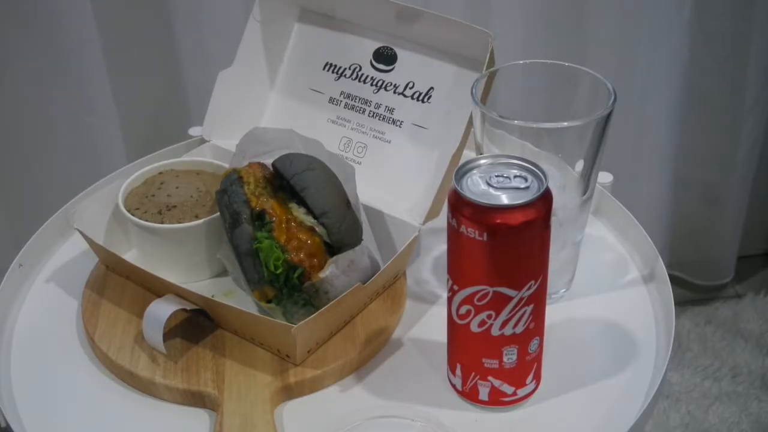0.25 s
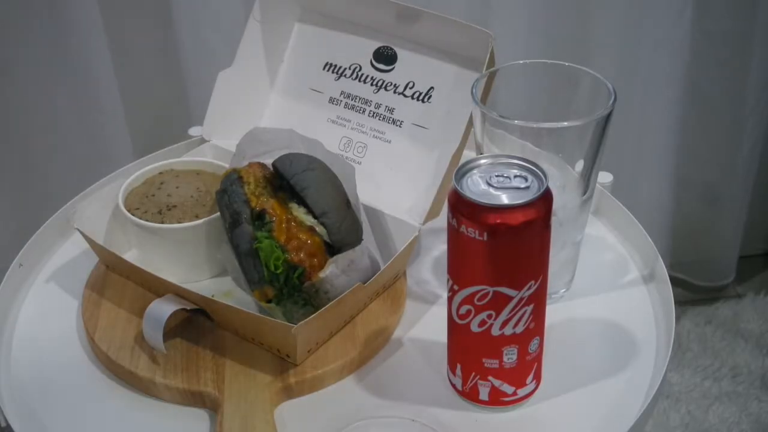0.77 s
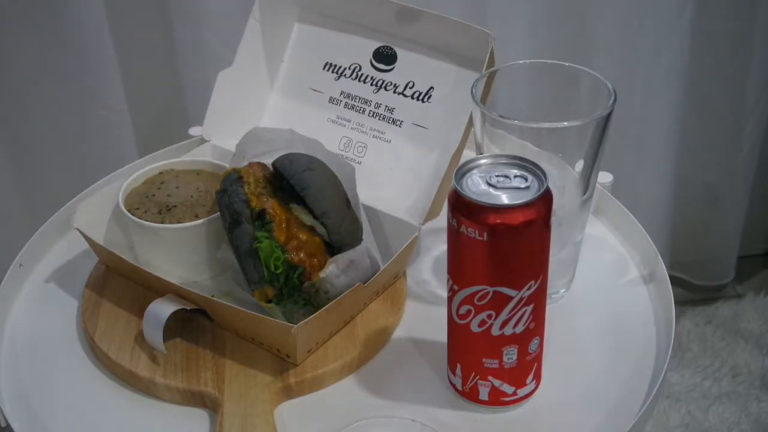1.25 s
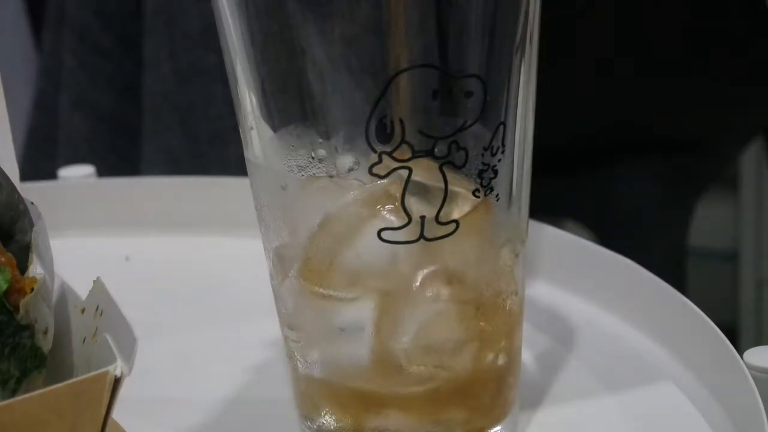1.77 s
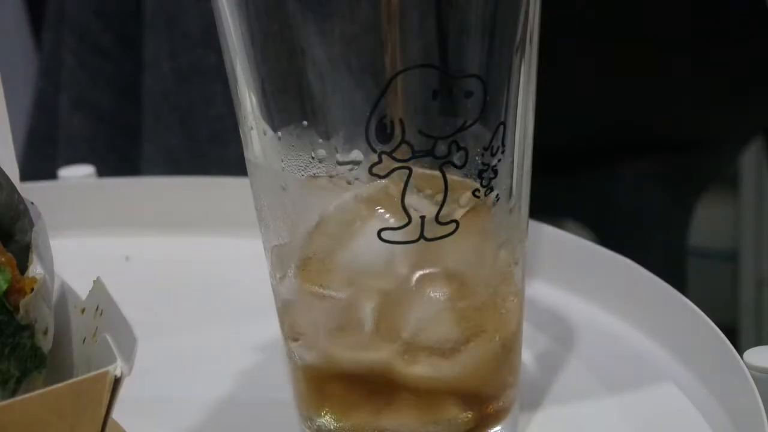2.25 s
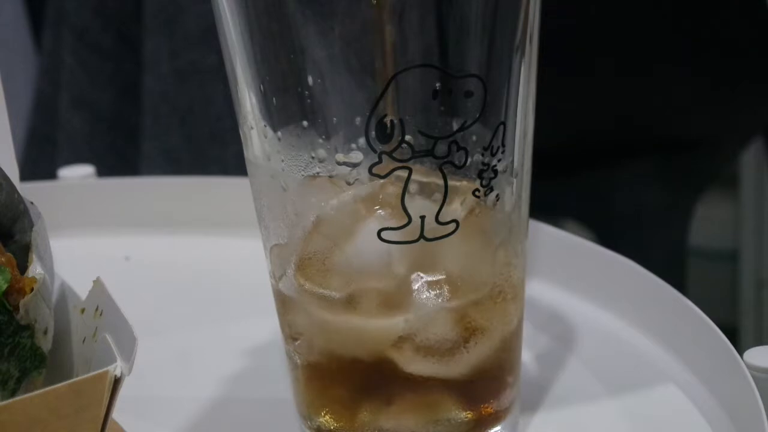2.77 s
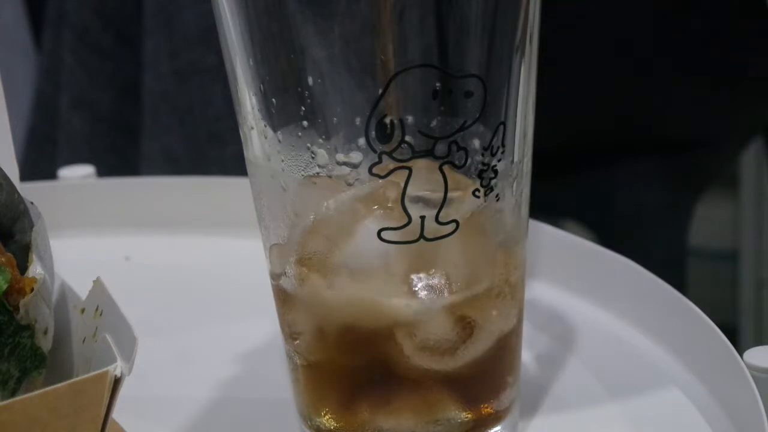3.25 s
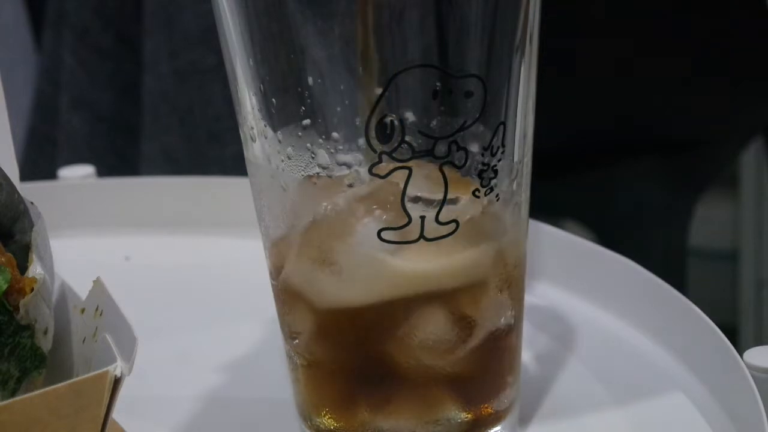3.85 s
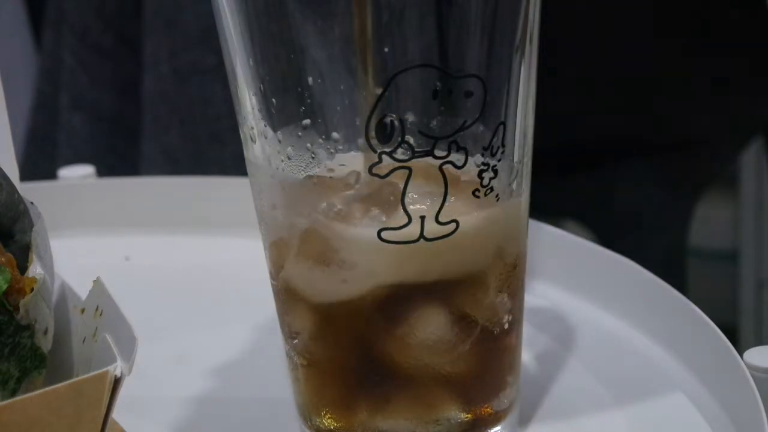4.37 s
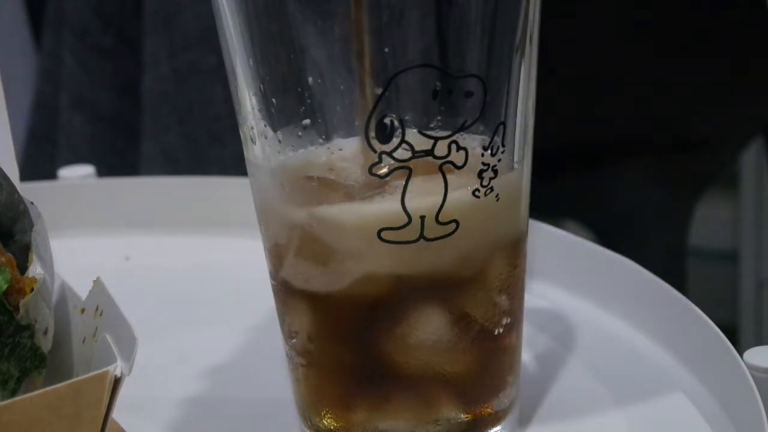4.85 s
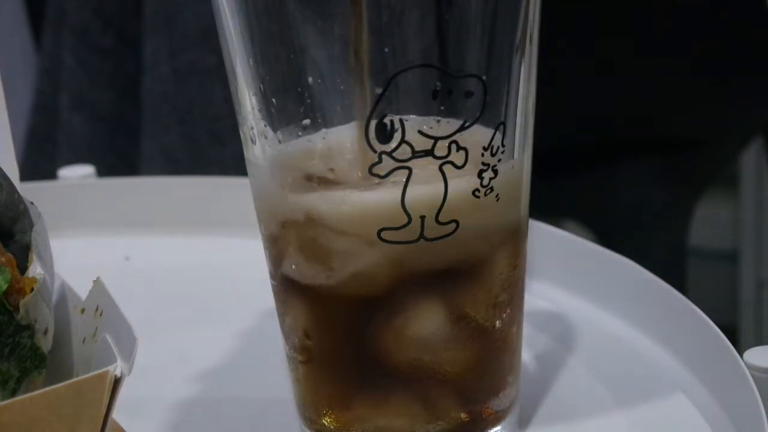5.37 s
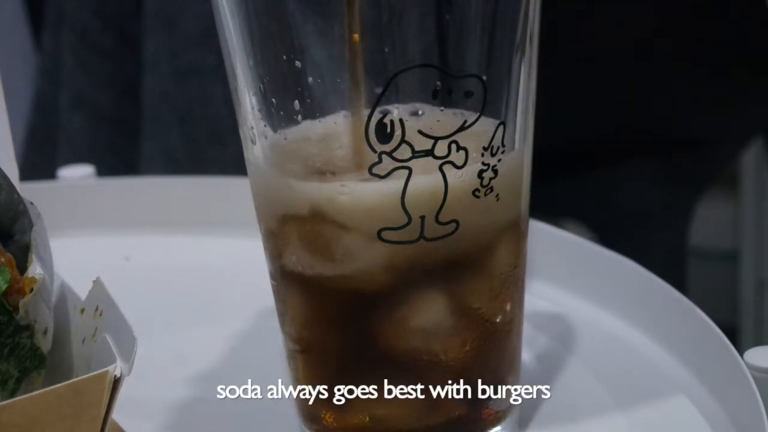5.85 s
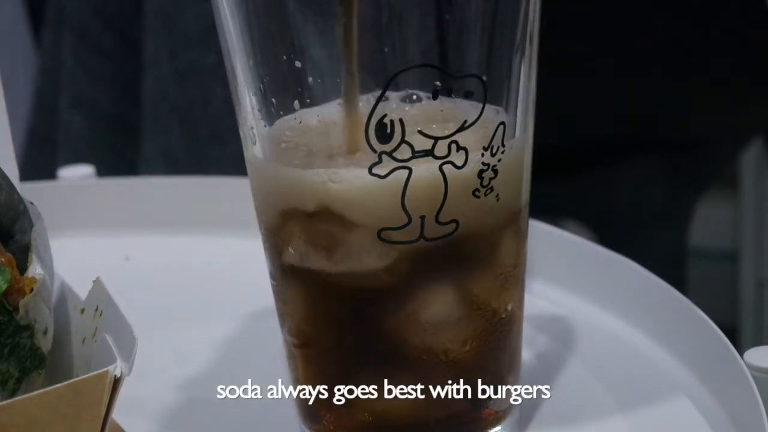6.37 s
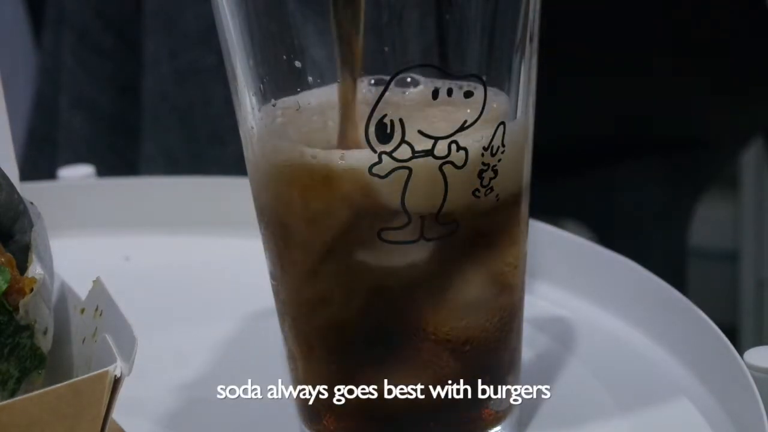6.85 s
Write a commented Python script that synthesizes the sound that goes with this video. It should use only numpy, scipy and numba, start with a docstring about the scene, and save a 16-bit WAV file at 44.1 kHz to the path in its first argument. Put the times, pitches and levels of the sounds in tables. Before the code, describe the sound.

A drink can pops and spits gas in a quiet kitchen, followed by a bubbly, fizzing pour onto ice that ticks and knocks.

```python
"""A can of fizzy drink is cracked open in a small kitchen and poured over ice into a tall glass.
Lid snaps are sums of decaying modes plus noise scratches; the escaping gas is a dense spray over a low rush.
Stream, froth and gurgle are swarms of damped sines, some ringing the air in the glass.
Noise bursts make the ice crack and knock; bubbles, and pings, some from cracking ice, are ringing chirps.
Behind them lie a room tone, a mains hum and a low rumble."""
import sys
import numpy as np
from scipy import signal
from scipy.fft import rfft, irfft
from scipy.io import wavfile
from scipy.ndimage import uniform_filter1d
from numba import njit

SR = 44100
rng = np.random.default_rng(int(sys.argv[2]) if len(sys.argv) > 2 else 0)


def generate_wav(signal):
    """Clip the signal to [-1, 1] and save it as 16-bit WAV at the path in sys.argv[1]."""
    frames = np.transpose(np.atleast_2d(signal))
    scaled = np.clip(frames, -1, 1) * 32767
    pcm = np.round(scaled).astype(np.int16)
    wavfile.write(sys.argv[1], SR, pcm)


N = 313462
T = np.arange(N) / SR
OPEN_S = 1.335

# stream surges and slaps on the ice: t/s, extra level/dB, 1/e half-width/s
STREAM_SURGES = [(2.018, 7.5, 0.045), (2.25, 2, 0.036), (2.69, 6.5, 0.027), (2.906, 5.5, 0.022),
                 (3.043, 1.5, 0.026), (3.765, 1, .04), (4.195, 5.5, .04), (4.5, 5.5, 0.072), (4.64, 4, .04),
                 (4.942, 6.5, 0.041), (5.15, 3.5, 0.081), (5.434, 2, 0.027), (5.67, 2.5, 0.035),
                 (5.798, 1.5, 0.022), (6.771, 6, .018)]


def undb(db):
    """Decibels to gain."""
    return 10 ** (np.asarray(db) / 20)


def unit(x):
    """Scale to rms 1."""
    return x / np.sqrt(np.mean(x ** 2))


def curves(table):
    """Columns of a table, linearly interpolated over time."""
    s, *columns = np.transpose(table)
    return [np.interp(T, s, c) for c in columns]


def swells(table):
    """Gaussian level rises in dB from rows of t/s, level/dB, 1/e half-width/s."""
    return sum(db * np.exp(-((T - s) / half_s) ** 2) for s, db, half_s in table)


def add(out, s, x, peak_db):
    """Mix x in at time s, scaled to the given peak level."""
    i = int(s * SR)
    scaled = x * undb(peak_db) / np.abs(x).max()
    out[i:i + len(x)] += scaled[:len(out) - i]


def colour(x, points):
    """Minimum-phase filter through (f/Hz, level/dB) points, by folding the cepstrum."""
    hz, db = np.transpose(points)
    size = 8192
    bin_hz = np.arange(size // 2 + 1) * SR / size
    gain = undb(np.interp(np.log(bin_hz + 1), np.log(hz), db))
    cepstrum = irfft(np.log(gain))
    cepstrum[1:size // 2] *= 2
    cepstrum[size // 2 + 1:] = 0
    impulse = irfft(np.exp(rfft(cepstrum)))
    return signal.fftconvolve(x, impulse)[:len(x)]


@njit
def resonate(x, hz, width_hz):
    """State-variable band-pass with a movable centre, gain 1 at the centre."""
    y, band, low = np.empty(len(x)), 0., 0.
    for i in range(len(x)):
        g, damping = np.tan(np.pi * hz[i] / SR), width_hz / hz[i]
        v = (band + g * (x[i] + 1e-18 - low)) / (1 + g * (g + damping))
        band = 2 * v - band
        low += 2 * g * v
        y[i] = damping * v
    return y


@njit
def chirps(start_s, hz, cycles, size, glide):
    """Damped sines: each falls 60 dB in its cycles while its pitch rises by the fraction glide."""
    out = np.zeros(N)
    for k in range(len(start_s)):
        length, first = int(cycles[k] / hz[k] * SR) + 2, int(start_s[k] * SR)
        turn = 2 * np.pi * hz[k] / SR
        phasor = size[k] + 0j
        step = np.exp(1j * turn - 6.9 / length)
        rise = np.exp(1j * turn * glide / length)
        for i in range(first, min(first + length, N)):
            out[i] += phasor.imag
            phasor *= step
            step *= rise
    return out


def bubbles(count, low_hz, high_hz, cycles, spread_db, glide):
    """Randomly timed damped sines, log-uniform in pitch, levels spread exponentially in dB; rms 1."""
    when, pitch, life, size = rng.random((count, 4)).T
    hz = low_hz * (high_hz / low_hz) ** pitch
    strength = np.minimum(-np.log(1 - size), 5.5)
    return unit(chirps(when * N / SR, hz, cycles * (.5 + life), undb(spread_db * strength), float(glide)))


def noise(points):
    """Coloured noise of rms 1."""
    return unit(colour(rng.standard_normal(N), points))


def walk(rate_hz):
    """Smoothed random steps, rms near 1."""
    k = int(SR / rate_hz)
    steps = np.repeat(rng.standard_normal(N // k + 1), k)
    return unit(uniform_filter1d(steps, k)[:N])


def burst(t60_s):
    """Decaying noise, 0.1 s long."""
    t = T[:SR // 10]
    return rng.standard_normal(len(t)) * undb(-60 * t / t60_s)


def can():
    """Each snap of the aluminium rings lid modes, t*exp(-t/tau), with a thin scratch on top."""
    # lid and can modes: f/Hz, relative level/dB, tau/s
    lid_modes = [(804, -5.5, 0.0055), (1207, 2, 0.0011), (2276, -9.5, 0.0015), (2830, -1.5, 0.0015),
                 (3580, -6.5, 0.0011), (4060, -3.5, 0.00061), (5140, -12, 0.00057), (782, -27, 0.016),
                 (860, -25, 0.014), (1170, -37, .012), (1264, -19.5, 0.017), (1365, -24, 0.0088),
                 (2120, -34, 0.0088), (2890, -42, .008)]
    # tab strains, score bursts, flap tears on: t/s, ring peak/dB, push centre f/Hz, scratch re ring/dB
    snaps = [(1.335, -32, 1300, -13), (1.341, -33, 2400, -10), (1.347, -28, 3600, -10),
             (1.3515, -25, 1300, -26), (1.3556, -4, 1940, -21), (1.3648, -20, 2600, -14),
             (1.368, -18.5, 1400, -16), (1.3735, -24, 1210, -26), (1.378, -22, 2200, -24),
             (1.3847, -27, 3020, -20), (1.3895, -33, 1200, -18), (1.397, -30, 1300, -11),
             (1.403, -27, 1100, -2), (1.4168, -24.5, 2200, -20), (1.427, -28, 1307, -20),
             (1.4333, -25, 1500, -14), (1.4395, -25.5, 1890, -10), (1.447, -32, 2600, -5),
             (1.4517, -24, 980, -24), (1.459, -44, 990, -20), (1.477, -47, 1500, 13.5),
             (1.51, -49.5, 2500, 13), (1.5265, -50, 1800, 4), (1.5912, -39, 1790, -5)]
    scratch_spectrum = [(300, -14), (1000, 0), (6000, 5.5), (8000, -3.0), (15000, -1)]
    burst_s = 1.356
    out, t = np.zeros(N), T[:SR // 5]
    rest_hz, mode_db, tau_s = np.transpose(lid_modes)[..., None]
    for s, peak_db, push_hz, scratch_db in snaps:
        # lid bends before and after the burst: random detuning, most for fast-decaying modes
        bend = min(abs(s - burst_s) / 0.019, 1)
        hz = rest_hz + bend * 0.21 / tau_s * np.clip(rng.standard_normal(tau_s.shape), -2, 2)
        # modes near the push centre ring most
        gain = undb(mode_db - 4.1 * np.log2(rest_hz / push_hz) ** 2)
        modes = gain * t / tau_s * np.exp(-t / tau_s) * np.sin(2 * np.pi * hz * t)
        add(out, s, np.sum(modes, axis=0), peak_db)
        add(out, s, colour(burst(t60_s=0.025), scratch_spectrum), peak_db + scratch_db)
    return out


def gas():
    """Gas leaves as a bright spray and a low rush: fast onset, spurt, sag, then spent."""
    # spray spectrum: f/Hz, level/dB
    spray_spectrum = [(1200, -28), (2000, -9.5), (3000, -12), (4600, -4.5), (6500, -13), (9000, -2.5),
                      (12500, 1.5), (15000, 6.5)]
    # rush spectrum: f/Hz, level/dB
    rush_spectrum = [(25, -2.5), (40, -10), (65, -15), (97, 3), (156, -19.5), (300, 2.5), (400, -7),
                     (800, -8), (2000, -18), (3000, -49)]
    attack_s, spent_s, spurt_s = 0.0058, .26, 0.024
    spray_base_db, rush_db, spurt_db, sag_db_per_s = -46.5, -43.5, 6.5, 15
    age_s = np.maximum(T - OPEN_S + attack_s / 2, 0)
    pressure = np.minimum(age_s / attack_s, 1) * np.exp(-(age_s / spent_s) ** 4)
    spray_db = spray_base_db + spurt_db * np.exp(-age_s / spurt_s) - sag_db_per_s * age_s
    jets = bubbles(count=30000, low_hz=1950, high_hz=15200, cycles=3.6, spread_db=2.5, glide=0)
    spray = unit(colour(jets, spray_spectrum))
    return pressure * (undb(spray_db) * spray + undb(rush_db) * noise(rush_spectrum))


def driven(surge_db, full_db, per_flow, per_surge):
    """Layer gain from full-flow level, and dB per dB of flow and of surge."""
    # can tilt sets the stream: t/s, flow re full stream/dB
    flow = [(1.62, -8.5), (1.95, -12), (2.14, -8.5), (2.3, -4), (2.54, -7.5), (2.8, -4), (3.2, -5),
            (3.56, -7), (3.75, -3), (4.32, -2), (4.5, -2.5), (4.76, -1), (5.12, 0), (5.7, -1), (6.0, -5),
            (6.58, -4), (6.82, 0), (7.11, -2)]
    flow_db, = curves(flow)
    return undb(full_db + per_flow * flow_db + per_surge * surge_db)


def glass(x, note_db, width_hz):
    """The air column rings with whatever stirs it; its lowest note rises as the glass fills."""
    # upper air resonances: f/Hz, width/Hz, relative level/dB
    upper_modes = [(2220, 80, -4.5), (2847, 126, 2.5), (3890, 760, -2.5), (4660, 98, 2.5)]
    # filling: t/s, lowest resonance f/Hz, level of the upper ones/dB
    air_note = [(1.6, 720, -1.5), (3.2, 792, -7), (3.7, 870, 4.5), (4.5, 920, 3), (5.2, 990, -4.5),
                (6.0, 1000, 5), (7.1, 1130, -4.5)]
    note_hz, upper_db = curves(air_note)
    lowest = resonate(x, note_hz, float(width_hz))
    upper = sum(undb(db) * resonate(x, np.full(N, float(hz)), float(width)) for hz, width, db in upper_modes)
    return x + undb(note_db) * lowest + undb(upper_db) * upper


def pour():
    """The wobbling stream traps large bubbles, spatters on ice, slaps in drops; froth bubbles burst."""
    # splash spectrum: f/Hz, level/dB
    splash_spectrum = [(210, -30), (350, -4), (614, -8), (705, 0), (1030, 2), (1190, -1.5), (1960, -1),
                       (2200, -8), (2860, -35), (4840, -120)]
    # spatter spectrum: f/Hz, level/dB
    spatter_spectrum = [(1300, -9.5), (1800, -5.5), (2500, 0), (3200, -0.5), (4500, 0), (5200, 0.5),
                        (7000, -18.5)]
    # fizz spectrum: f/Hz, level/dB
    fizz_spectrum = [(2650, -29), (4500, -7.5), (4740, -14), (5420, -8), (7100, -2.5), (8200, -3),
                     (12500, 6), (14400, 8.5), (15000, 8), (15500, 6.5)]
    surge_db = swells(STREAM_SURGES) + 1.05 * walk(rate_hz=28)
    # stream lands on a bare cube for a while: more spatter, less splash
    bare = np.exp(-((T - 3.1) / 0.72) ** 2)

    large = bubbles(count=9000, low_hz=363, high_hz=2150, cycles=4.8, spread_db=2, glide=0.13)
    blips = bubbles(count=260, low_hz=452, high_hz=1480, cycles=20, spread_db=1.0, glide=.15)
    splash = unit(colour(large, splash_spectrum)) + undb(-7.5) * blips
    splash = unit(glass(splash, note_db=-10.5, width_hz=150)) * undb(-1.5 * bare)
    splash *= driven(surge_db, full_db=-55.5, per_flow=0.66, per_surge=0.86)

    specks = bubbles(count=16000, low_hz=1500, high_hz=5730, cycles=3.7, spread_db=0.0, glide=0.093)
    drops = bubbles(count=700, low_hz=1010, high_hz=4000, cycles=5.1, spread_db=3.0, glide=0)
    spatter = unit(colour(specks, spatter_spectrum)) + undb(-6.5) * drops
    spatter = unit(glass(spatter, note_db=-8, width_hz=220)) * undb(5.5 * bare)
    spatter *= driven(surge_db, full_db=-57.5, per_flow=1.22, per_surge=0.71)

    froth = bubbles(count=70000, low_hz=3940, high_hz=16000, cycles=4.1, spread_db=0.0, glide=0)
    prickle = bubbles(count=1500, low_hz=6000, high_hz=14800, cycles=34, spread_db=3.5, glide=.04)
    fizz = unit(colour(froth, fizz_spectrum)) + undb(-14) * prickle
    fizz *= driven(surge_db, full_db=-53, per_flow=0.98, per_surge=.35)
    return splash + spatter + fizz


def gurgle():
    """The stream plunges into the first shallow pool and traps bubbles of nearly one size."""
    # gurgles: t/s, 1/e half-width/s, level/dB
    gurgles = [(2.01, 0.047, -60), (2.28, 0.12, -60.5)]
    swell = sum(undb(db) * np.exp(-((T - s) / half_s) ** 2) for s, half_s, db in gurgles)
    return swell * bubbles(count=1800, low_hz=1400, high_hz=2050, cycles=20, spread_db=1.5, glide=.08)


def ice():
    """Cubes crack with a bright tick, and knock dully in the glass as they start to float."""
    # cracks in the warm drink: t/s, relative peak level/dB
    cracks_at = [(1.993, -30.5), (1.997, -30.5), (2.676, -30), (2.876, -36), (3.0334, -39), (3.759, -33),
                 (4.0343, -30), (4.0562, -36), (4.1477, -23.5), (4.159, -19), (4.176, -19.5), (4.193, -28),
                 (4.22, -31), (4.402, -34), (4.423, -33), (4.449, -33), (4.469, -31), (4.5503, -31),
                 (4.93, -34), (4.937, -37), (5.412, -38)]
    # crack spectrum: f/Hz, level/dB
    crack_spectrum = [(600, -7), (1000, -1.5), (2000, -6.5), (4800, -9.5), (6200, 0.5), (8500, -0.5),
                      (10000, -2.5), (12500, -2.5), (15000, -1.5)]
    # cubes shift and knock: t/s, relative peak level/dB
    knocks_at = [(3.725, -31.5), (3.758, -36.5), (3.928, -43), (4.104, -41), (4.159, -32), (4.176, -33),
                 (4.199, -35), (4.258, -29.5), (4.371, -33), (4.468, -28.5), (4.488, -35), (4.519, -37),
                 (4.921, -41), (4.954, -37), (5.068, -33), (5.084, -29.5), (5.251, -32), (5.783, -36),
                 (6.633, -36), (6.694, -36), (6.753, -28), (6.7568, -38), (6.7637, -32), (6.768, -30.5)]
    knock_spectrum = [(120, -11), (300, -1.0), (1000, 4.5), (1800, -1), (3000, -11.5), (6000, -21), (12000, -21)]
    cracks, knocks = np.zeros(N), np.zeros(N)
    for s, db in cracks_at:
        add(cracks, s, colour(burst(t60_s=0.014), crack_spectrum), db - 2)
        add(cracks, s, colour(burst(t60_s=0.0023), crack_spectrum), db - 2.5)  # sharp first split
    for s, db in knocks_at:
        add(knocks, s, colour(burst(t60_s=0.0088), knock_spectrum), db)
    return cracks + undb(-7.0) * glass(knocks, note_db=10.0, width_hz=136)


def pops_and_pings():
    """A bubble, or the bright ping of an ice crack, ticks and rings, a weaker companion up to 3 ms behind."""
    # bubbles, and pings, some from cracking ice: t/s, initial ring level/dB, f/Hz
    singles = [(1.44, -26.5, 2010), (1.555, -42.5, 3930), (1.6493, -50.5, 3790), (1.7318, -42, 4180),
               (1.797, -49, 1440), (2.0326, -42.5, 5480), (2.22, -44, 1800), (2.241, -42, 1600),
               (2.264, -39.5, 1790), (2.317, -38, 1720), (2.382, -47, 1490), (2.3961, -44, 9930),
               (2.524, -48, 3880), (2.6091, -40, 12700), (2.639, -36.5, 5170), (2.675, -35.5, 9000),
               (2.7663, -42, 10940), (2.8765, -34, 14200), (2.9134, -38, 12400), (3.0032, -40, 6350),
               (3.004, -43, 9300), (3.0334, -40, 11300), (3.299, -44.5, 2280), (3.506, -45, 3750),
               (4.0564, -34, 10500), (4.4023, -39, 6960), (4.4232, -42, 6990), (5.1254, -38, 12400),
               (5.4112, -37.5, 9200), (5.449, -40, 2290), (5.6303, -37, 12700), (5.666, -44, 2780),
               (5.687, -35, 11850), (5.713, -39, 12400), (6.283, -47, 7300)]
    s, db, hz = np.array(singles, float).T.copy()
    cycles = 27 * (hz / 1000) ** 0.53  # to -60 dB; higher pitches ring for more cycles
    lag, detune = rng.random((len(s), 2)).T
    ticks = np.zeros(N)
    for when, level_db, pitch in singles:
        tick = colour(burst(t60_s=0.013), [(pitch / 4, -18), (pitch, 0), (pitch * 2, -8)])
        add(ticks, when, tick, level_db - 9)
    rings = chirps(s, hz, cycles, undb(db), 0.034)
    companions = chirps(s + .003 * lag, hz * (0.954 + 0.09 * detune), cycles * 0.51, undb(db - 1.5), .1)
    return ticks + companions + rings


def background(opened):
    """Faint wandering room tone and thin hiss; after opening, mains hum and a rumble that follows the pour."""
    # room tone spectrum: f/Hz, level/dB
    quiet_spectrum = [(25, -5), (119, -15), (170, -5.5), (350, -4), (600, -10.5), (800, -8.5),
                      (1500, -16.5), (3000, -25.5), (6000, -35), (12000, -47)]
    # rumble spectrum: f/Hz, level/dB
    rumble_spectrum = [(25, -2), (40, -8.5), (57, -3), (75, -6.5), (135, -12), (165, -8.5), (186, 1.5),
                       (205, -6), (240, -0.5), (275, 0), (305, 2), (380, -4.5), (520, -9), (800, -16.5),
                       (1600, -24.5)]
    # mains harmonics: f/Hz, mean rms level/dB
    hum_lines = [(100, -64.5), (200, -83), (300, -69.5)]
    # faint hiss swells: t/s, extra level/dB, 1/e half-width/s
    hiss_swells = [(.3, 4, 0.21), (1.33, 12, 0.14)]
    thin_spectrum = [(2000, -14), (5000, -5.5), (9000, -3.5), (13000, -0.5), (15000, -1.5)]
    murk = undb(-69.5 + 3.2 * walk(rate_hz=4.8)) * noise(quiet_spectrum)
    thin = undb(-84 + swells(hiss_swells)) * noise(thin_spectrum)
    hum = sum(undb(db) * np.sqrt(2) * np.sin(2 * np.pi * hz * T) for hz, db in hum_lines)
    hum = hum * undb(walk(rate_hz=7))
    rumble_gain = driven(swells(STREAM_SURGES), full_db=-54, per_flow=0.4, per_surge=0.93)
    return murk + thin + opened * (rumble_gain * noise(rumble_spectrum) + hum)


def kitchen(x, t60_low_s, t60_high_s, wet_db):
    """Close walls answer after 4 ms with scattered noise; bass and treble decay separately."""
    t = T[:SR * 3 // 5]
    scatter = rng.standard_normal(len(t)) * (t > .004)
    low = signal.sosfilt(signal.butter(1, 3500, fs=SR, output="sos"), scatter)
    high = scatter - low
    tail = low * undb(-60 * t / t60_low_s) + high * undb(-60 * t / t60_high_s)
    return x + undb(wet_db) * signal.fftconvolve(x, tail / np.linalg.norm(tail))[:N]


def scene():
    """Can, stream, ice, pops and pings, with room tails, over the background; mono."""
    opened = np.clip((T - OPEN_S) / 0.015, 0, 1)
    opening = kitchen(can() + gas(), t60_low_s=0.33, t60_high_s=0.19, wet_db=-12.5)
    stream = kitchen(opened * pour() + gurgle(), t60_low_s=0.34, t60_high_s=0.33, wet_db=-9.0)
    cubes = kitchen(ice(), t60_low_s=0.43, t60_high_s=0.58, wet_db=-3.5)
    plinks = kitchen(pops_and_pings(), t60_low_s=0.13, t60_high_s=0.17, wet_db=-7.5)
    return (opening + stream + cubes + plinks + background(opened))[None]


def record(dry):
    """The recorder cuts the top steeply: elliptic low-pass at 15.05 kHz."""
    return signal.sosfilt(signal.ellip(12, .2, 70, 15050, fs=SR, output="sos"), dry)


dry = scene()
out = record(dry)
generate_wav(out)
```